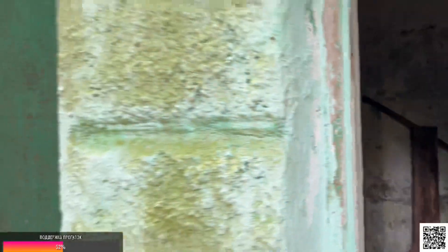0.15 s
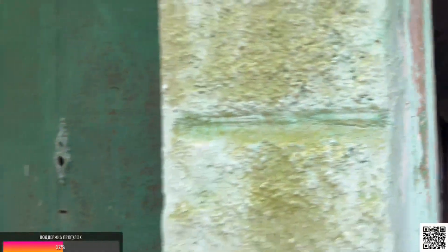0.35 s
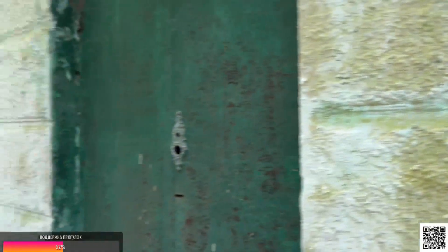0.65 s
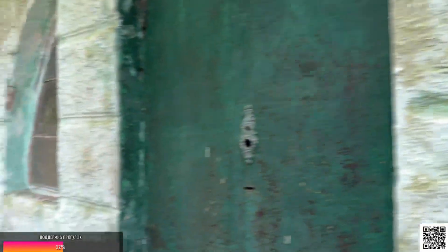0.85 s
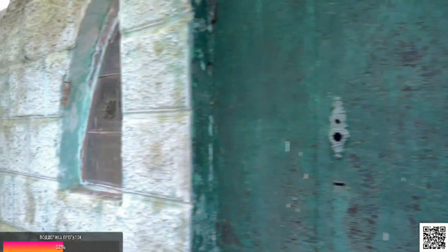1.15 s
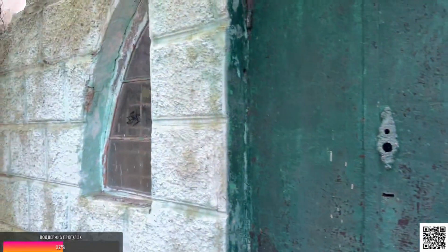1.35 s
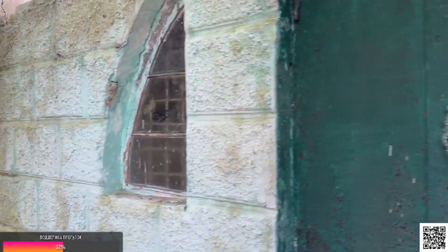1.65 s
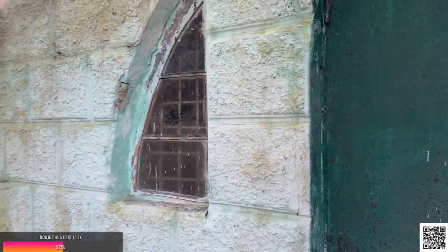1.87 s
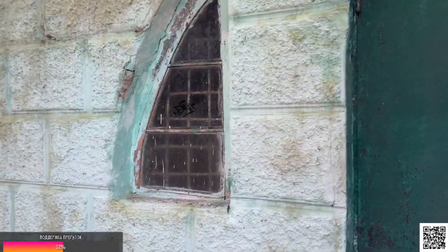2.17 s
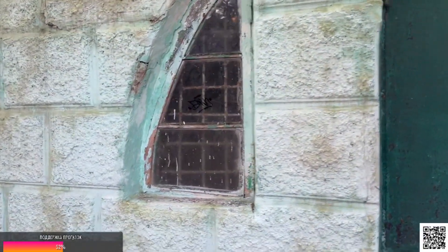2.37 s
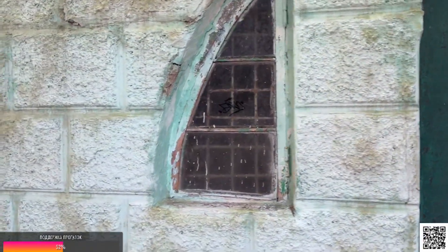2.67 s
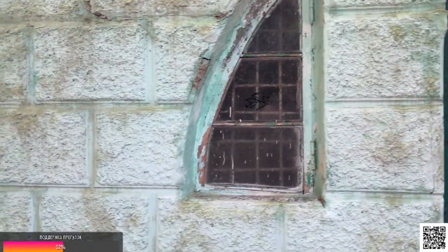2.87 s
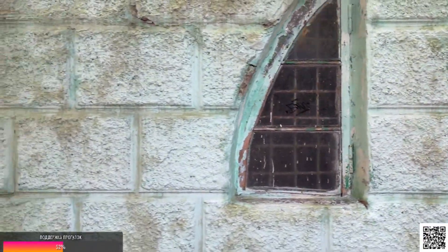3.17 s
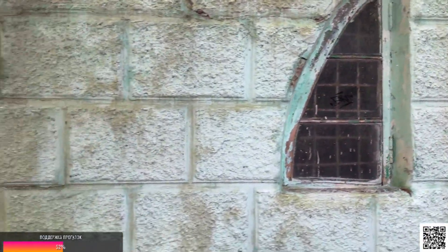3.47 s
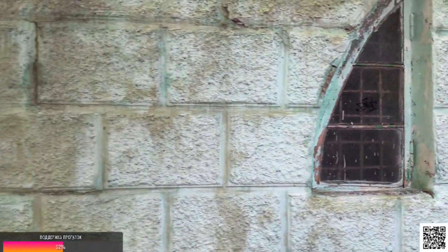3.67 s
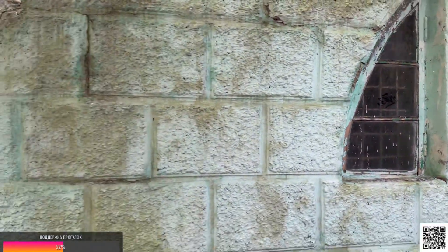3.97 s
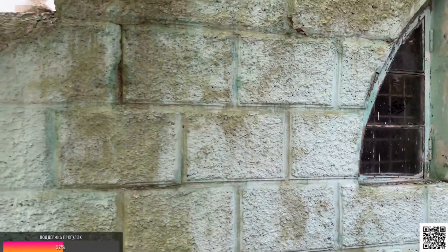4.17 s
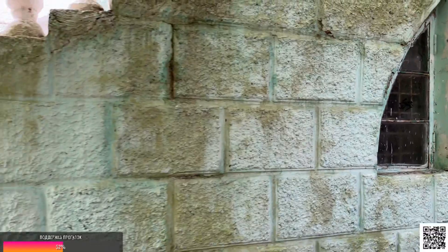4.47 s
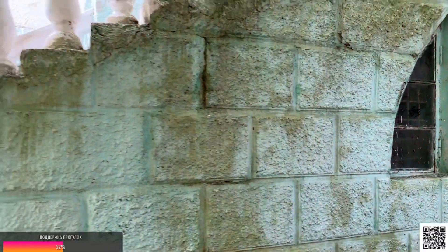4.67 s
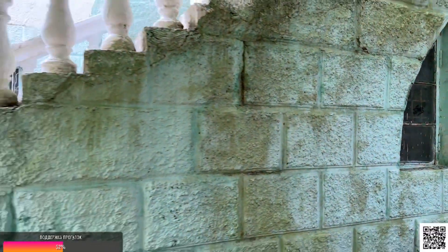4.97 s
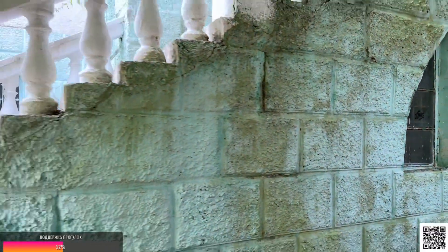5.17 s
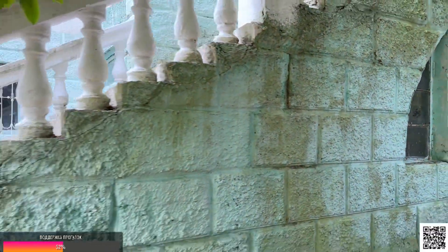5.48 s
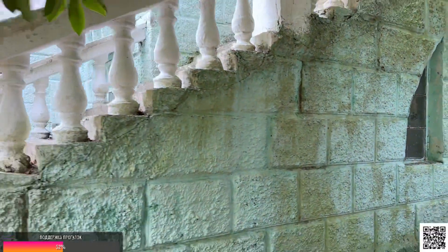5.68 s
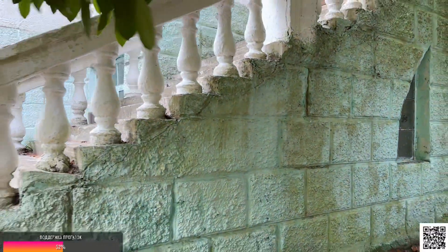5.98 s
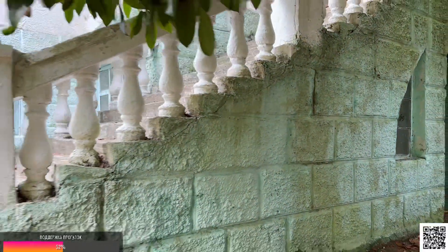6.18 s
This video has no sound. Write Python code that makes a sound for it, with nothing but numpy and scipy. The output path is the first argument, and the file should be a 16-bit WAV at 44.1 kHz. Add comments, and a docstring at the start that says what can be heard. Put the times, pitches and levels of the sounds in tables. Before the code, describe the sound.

Someone walks unhurriedly on gritty ground, soles crushing grains, small bits clicking and skittering, twigs snapping sharply, over very faint rumbling air.

```python
"""Footsteps on grit beside a stone wall

Someone walks slowly over grit and dry debris, carrying the microphone. Soles scuff and crush the grit
(ticks, damped sines and noise); bits crack, knock and skitter (short tones, noise and resonances).
Two dry twigs snap (decaying modes) and heels thud softly (low sines). Once a hollow, rough tone swells
further off (wavering sine, resonant noise). Air rumbles faintly under it all (filtered noise)."""
import sys
import numpy as np
from scipy import signal
from scipy.fft import rfft, irfft, next_fast_len
from scipy.io import wavfile
from scipy.ndimage import map_coordinates

SR = 44100
rng = np.random.default_rng(int(sys.argv[2]) if len(sys.argv) > 2 else 0)


def int16_out(signal):
    """Quantize to a 16-bit WAV file."""
    q = np.round(np.clip(np.atleast_2d(signal).T, -1, 1) * 32767)
    wavfile.write(sys.argv[1], SR, q.astype(np.int16))


N = 279108  # samples, about 6.3 s


def scuff():
    """The sole drags over grit: grains give way in clumps, together in all three size classes."""
    # Spectra of grit, its dull part and finest sand. Each row: frequency in Hz, level in dB.
    grit_spectrum = [(1200, -12), (2000, -1.5), (3000, 0), (4500, 0.5), (5600, -2), (6500, -8.5),
                     (8500, -17), (11000, -21.5)]
    dull_spectrum = [(200, -29.5), (450, -0.5), (900, -2), (1500, -2.5), (2100, -10), (3000, -61.5)]
    sand_spectrum = [(4000, -36.5), (6000, 5), (7500, 13), (10000, -1), (13000, -16), (16000, -29)]
    crunch_level, dull_level, sand_level, stone_hz = strokes()
    clumps = amp(1.6686 * wobble(70) + 0.691 * wobble(250) - 2.0)

    stones = grains(count=9000, mid_hz=stone_hz, octaves=0.27967, cycles=3.145, spread_db=1.0)
    crushed = coloured(crackle(rate=1300, spread_db=-1.0, grain_share=0.55), grit_spectrum)
    grit = unit(crushed + 0.9765 * stones)

    rubble = grains(count=2000, mid_hz=stone_hz / 3.2718, octaves=0.56404, cycles=2.642, spread_db=4.0)
    dull = unit(coloured(rng.standard_normal(N), dull_spectrum) + 0.8636 * rubble)

    sand = coloured(crackle(rate=1400, spread_db=-1.0, grain_share=0.7203), sand_spectrum)
    return clumps * (crunch_level * grit + dull_level * dull + sand_level * sand)


def strokes():
    """Levels of crunch, dull part and sand, and the stone pitch, as the powers of all strokes add up."""
    # The sole drags or presses on the grit. Each row: start of the hold in seconds, rise in seconds over
    # 60 dB, hold in seconds, fall in seconds over 60 dB, crunch level in dB, dull part and finest sand
    # in dB relative to the crunch, stone pitch in Hz. Signs of rise, hold and fall do not matter.
    drags = [(0.0, .01, 0.0034, 1.4679, -64, -4.5, -11, 4289),
             (0.096, -0.2215, 0.0187, 1.6257, -62.5, -9, -18.5, 4082),
             (0.161, 0.081, 0.0553, 1.0591, -49.5, -20, -17.5, 4142),
             (0.202, 0.0512, 0.0197, 0.362, -44.5, -9.5, -29.5, 4248),
             (0.273, 0.2754, 0.00637, 0.4066, -45, -12, -14.5, 3865),
             (0.356, 0.0039, 0.0535, 0.4763, -49.5, -7.5, -15.5, 3552),
             (0.577, 1.2151, 0.0311, 0.1449, -59.5, 1, -13, 3260),
             (0.503, 0.2445, 0, 0.2174, -47.5, -7, -35, 3093),
             (0.76, 2.277, 0, 1.8833, -65.5, -2.5, -11.5, 3512),
             (0.966, 0.2671, 0.0438, 0.3518, -41, -8.5, -19.5, 3830),
             (1.058, 0.3926, 0.0307, 0.6041, -49, -5.5, -27.5, 3602),
             (1.189, 0.5985, 0, 0.6529, -52.5, -3, -17, 3373),
             (1.344, -0.74, 0, 0.8508, -64, -30.5, -13, 3223),
             (1.605, 0.7772, 0.1316, 1.5443, -58, -5, -13, 3787),
             (1.7, 0.0902, 0.00685, 0.0878, -45.5, -12.5, -24, 4395),
             (1.749, 0.1433, 0.0175, 0.2759, -60, -4.5, -21, 4366),
             (1.925, 0.8873, 0.0274, 1.9409, -65, 1.5, -27.5, 2814),
             (2.401, 1.6775, 0, 1.232, -66.5, 2.5, -13, 3530),
             (2.658, 0.406, 0.0219, 0.2887, -63, -6, -17, 3283),
             (2.794, 0.3487, 0.0089, 1.1988, -62.5, 2, -13.5, 3162),
             (3.158, 0.5253, 0, 2.3484, -67.5, 6, -33.5, 2504),
             (3.364, 0.7582, 0.0725, 0.6277, -63, 8.5, -15, 2815),
             (3.666, 2.91, 0.0221, 1.4316, -69.5, 7, -11, 2955),
             (3.891, -0.0274, 0, 0.9576, -58, 0, -24, 2968),
             (4.021, 0.2536, 0, 0.6747, -57, -0.5, -15.5, 2610),
             (4.149, 0.5068, 0.29, 0.5559, -59, -6, -25, 2916),
             (4.396, 0.2143, 0.338, 0.41, -59, 5.5, -13.5, 3307),
             (4.649, -1, 0.0931, 1.4334, -68, 0, -3, 3576),
             (5.442, 0.8819, 0.0266, 1.0151, -68, 0.5, -8, 3505),
             (5.564, 0.0855, 0.0092, 1.8488, -68.5, 1.5, -6.5, 3509),
             (5.822, 0.1195, 0, -0.5552, -66, -2, -25, 3100), (6.0, 0.68, 0.043, 1.89, -70, 5, -4.5, 3496),
             (4.956, -1.3055, 0.0795, 1.0496, -63, -6, -19.5, 3604),
             (6.28, 0.2624, 0.0151, 1.6891, -64, 1, -9, 3015)]
    # The foot comes down: start of the hold in seconds.
    landing_s = [0.854, 2.152, 3.802, 4.363, 4.846, 6.038]
    # The crunch of each landing. Each row: hold in seconds, fall in seconds over 60 dB, crunch level in dB,
    # dull part and finest sand in dB relative to the crunch, stone pitch in Hz.
    landings = [(0, .5, -51, 1, -13, 3353.6), (0.0136, 0.8362, -54, -5, -13.5, 3131.7),
                (0, 0.5159, -50.5, -3, -18, 2521.8), (0.00863, 0.0922, -43, -13.5, -7, 4480),
                (0.02719, 0.1804, -38, -8, -12, 4046.5), (0.14231, 0.207, -40, -4.5, -16, 4000.6)]
    landing_rise_s = 0.012  # over 60 dB: almost at once
    sag_db_per_s = 38.5  # the crunch weakens while the sole holds
    settle_db, settle_s = -19, 0.7224  # loosened grit trickles on, falling 60 dB in settle_s

    t, total = np.arange(N) / SR, np.zeros((4, N))
    steps = [(s, landing_rise_s, *row) for s, row in zip(landing_s, landings)]
    for s, rise, hold, fall, db, dull_db, sand_db, hz in drags + steps:
        before = np.maximum(s - t, 0)
        held = np.clip(t - s, 0, abs(hold))
        after = np.maximum(t - s - abs(hold), 0)
        swell = amp(db - 60 * before / abs(rise) - sag_db_per_s * held)
        release = amp(-60 * after / abs(fall)) + amp(settle_db - 60 * after / settle_s)
        power = (swell * release) ** 2 + 1e-12
        total += power * np.array([[1], [amp(2 * dull_db)], [amp(2 * sand_db)], [hz]])
    return *np.sqrt(total[:3]), total[3] / total[0]  # the pitch is a mean weighted by crunch power


def grains(count, mid_hz, octaves, cycles, spread_db):
    """Small stones: short damped sines at scattered times and sizes, pitched around the curve mid_hz."""
    draw, t = rng.random((count, 2)), np.arange(256) / SR
    start = (draw[:, :1] * N).astype(int)
    hz = np.clip(mid_hz[start] * 2 ** (octaves * rng.standard_normal((count, 1))), 300, 9000)
    size = amp(-spread_db * np.log(np.maximum(draw[:, 1:], 0.02)))
    rings = size * np.sin(2 * np.pi * hz * t) * np.exp(-t * hz / cycles)
    places = start + np.arange(256)
    return unit(np.bincount(places.ravel(), rings.ravel(), N + 256)[:N])


def crackle(rate, spread_db, grain_share):
    """Random ticks of unequal size, rate a second, on a bed of noise."""
    size_db = spread_db * np.minimum(rng.exponential(size=N), 4)
    ticks = (rng.random(N) < rate / SR) * amp(size_db) * rng.choice([-1, 1], N)
    share = np.clip(grain_share, 0, 1)
    return np.sqrt(share) * unit(ticks) + np.sqrt(1 - share) * rng.standard_normal(N)


def cracks(under_db, far_db):
    """Each bit rings briefly at its own pitch and sprays grit around that pitch."""
    # Bits of debris crack (high) or knock (low).
    # Each row: start in seconds, level in dB, pitch in Hz, share of noise from 0 to 1.
    bits = [(0.0912, -42.5, 4153, 0.58), (0.189, -37, 3561, 0.47), (0.201, -33.5, 4645, 0.21),
            (0.201, -42, 404.3, 0), (0.2302, -46.5, 3300, 0.73), (0.2769, -37, 4679, 0.69),
            (0.279, -34, 1459, 0.76), (0.345, -42.5, 4400, 0.79), (0.456, -49.5, 3400, 0.85),
            (0.489, -44.5, 938.3, 0), (0.5031, -36, 3508, 0.03), (0.8539, -40.5, 1484, 0.25),
            (0.8965, -51.5, 1631, 0.25), (0.964, -23.5, 2884, 0.39), (0.9759, -20.5, 4789, .36),
            (0.978, -36.5, 9713, 0.46), (0.9865, -20, 3140, 0.36), (0.995, -23, 3926, 0.67),
            (1.003, -29.5, 2695, 0.56), (1.044, -31.5, 1445, 0.1), (1.045, -25.5, 3899, 0.48),
            (1.0502, -27, 3248, 0.44), (1.142, -49, 5483, 0.41), (1.1655, -30.5, 3138, 0.45),
            (1.17, -34, 3331, 0.06), (1.1921, -31, 2925, 0.5), (1.25, -42, 4276, 0.4),
            (1.5721, -38.5, 3670, 0.44), (1.6355, -45, 3879, 0.19), (1.662, -37.5, 2358, 0.54),
            (1.688, -34.5, 2698, 0.72), (1.697, -27.5, 4524, 0.47), (1.949, -42.5, 251.8, 0.11),
            (2.1533, -41, 2426, 0.2), (2.1751, -37.5, 2992, 0.32), (2.185, -38, 3186, 0.68),
            (2.6531, -42.5, 3004, 0.61), (2.774, -34, 240.3, 0.37), (3.1015, -42.5, 2200, 0.94),
            (3.317, -41, 517.8, 0), (3.6128, -44.5, 3053, 0.8), (3.936, -33, 3011, 0.92),
            (4.171, -47.5, 551.8, 0.13), (4.3629, -44.5, 2178, 0.13), (4.3897, -39.5, 4478, .8),
            (4.396, -40.5, 581.4, 0.33), (4.413, -36, 247.7, 0.33), (4.423, -30, 245.9, 0.46),
            (4.455, -36, 268.3, 0.58), (4.494, -45.5, 398.3, 0.34), (4.53, -47.5, 300.2, 0.41),
            (4.565, -45, 300, 0.25), (4.63, -40.5, 299.2, 0.47), (4.685, -43, 298.2, 0.67),
            (4.8541, -37.5, 3835, 0.25), (4.863, -27, 4359, 0.58), (5.008, -45, 448.8, 0.46),
            (5.455, -44.5, 301.4, 0.31), (5.508, -38, 379.7, 0.38), (5.648, -44.5, 262.9, 0.56),
            (5.799, -56, 5970, 0.91), (5.8208, -49, 3122, 0.39), (5.916, -51, 540.5, 0.35),
            (5.965, -53.5, 620.6, 0.2), (5.98, -53, 637.9, 0.14), (6.0373, -29.5, 4412, 0.38),
            (6.047, -28, 1447, 0.21), (6.0683, -24.5, 2924, 0.59), (6.0758, -25.5, 2593, 0.89),
            (6.1013, -30.5, 1854, 0.35), (6.128, -31, 1331, 0.11), (6.128, -26, 4263, 0.45),
            (6.1576, -25, 3774, 0.88), (6.1705, -27, 2979, 0.67), (6.1884, -29, 4107, 0.52),
            (6.246, -35.5, 792, 0.83), (6.2555, -35, 1476, 0.98)]
    tone_t60_s = 0.017974  # ring time of a bit without noise
    noisy_shorter = 0.52426  # share of its ring time that a bit of pure noise loses
    over_1k_db, over_db_per_octave = -4.5, -7  # spray above a 1 kHz bit; low bits spray wider

    out, t = np.zeros(N), np.arange(SR // 8) / SR
    for s, db, hz, noisy in bits:
        over_db = over_1k_db + over_db_per_octave * np.log2(hz / 1000)
        spread = [(hz / 8, 4 * under_db), (hz / 2, under_db), (hz * 1.33, -1.5),
                  (hz * 2.44, over_db), (hz * 6, far_db)]
        spray = coloured(rng.standard_normal(len(t)), spread)
        blur = 0.0535 * np.cumsum(rng.standard_normal(len(t)))  # rough surface blurs the pitch
        tone = np.sin(2 * np.pi * hz * t + blur)
        share = np.clip(noisy, 0, 1)
        decay = amp(db - 3.0 - 60 * t / (tone_t60_s * (1 - noisy_shorter * share)))
        attack = 1 - np.exp(-t / 0.00050444)
        spike = 1 + 1.3088 * np.exp(-t / 0.000519)  # as it breaks
        mix = (1 - share) * 1.8408 * tone + share * 1.2399 * spray
        add(out, s, decay * attack * spike * mix)
    return out


def skitter():
    """A dry shard skitters over the ground: each scrape is a burst of grit in the shard's resonances."""
    # Each row: start in seconds, level in dB, time to fall 60 dB in seconds, tilt in dB per octave.
    scrapes = [(3.8016, -32.5, 0.0735, -3.5), (3.8125, -37.5, 0.1129, 7.5), (3.851, -43, 0.0459, -1.5),
               (3.874, -31.5, 0.05675, -15.5), (3.8874, -36, 0.0402, 7.5), (3.988, -33.5, 0.05477, 2.5),
               (3.9932, -35.5, 0.02835, -12.5), (4.013, -29.5, 0.06013, -6), (4.0233, -35, 0.0474, 17.5),
               (4.0524, -42, 0.0497, 1.5), (4.0866, -42, 0.0647, 11.5), (4.12, -41.5, 0.0845, 7),
               (4.133, -37, 0.0788, -5.5), (4.1678, -35, 0.07252, 3), (4.2034, -42.5, 0.07174, 7),
               (4.2251, -48.5, 0.0553, -7.5), (4.2666, -43, 0.07124, 1), (4.326, -45, 0.0607, -2.5)]
    # Resonances of the shard. Each row: frequency in Hz, width in Hz, level in dB before the tilt.
    shard = [(1759.7, 158.9, -0.5), (2295.5, 242.8, 3.5), (3291.9, 247.4, 2.5), (4628.2, 261.9, -13.5),
             (5325, 364, -24.5)]
    out, t = np.zeros(N), np.arange(SR // 6) / SR
    for s, db, t60, tilt_db in scrapes:
        modes = []
        for hz, width, level in shard:
            scatter_db = 5.13 * rng.standard_normal()
            modes.append((hz, width, level + tilt_db * np.log2(hz / 2500) + scatter_db))
        contacts = rng.standard_normal(len(t)) ** 3  # cubed noise is spiky
        rasp = unit(filtered(contacts, resonances(modes)))
        decay = amp(db - 6.5 - 60 * t / t60)
        attack = 1 - np.exp(-t / 0.0009094)
        spike = 1 + 0.8015 * np.exp(-t / 0.001447)
        add(out, s, decay * attack * spike * rasp)
    return out


def snaps():
    """Dry wood breaks: a few modes that die within milliseconds; a thick twig adds a low one."""
    # Each row: start in seconds, level in dB, tilt in dB per octave, level of the lowest mode in dB.
    breaks = [(3.361, -13, 1.5, -44), (3.5372, -18.5, 3, -1.5)]
    # Modes of a twig. Each row: frequency in Hz, level in dB before the tilt, time to fall 60 dB in seconds.
    twig = [(1478.2, 1, 0.00934), (2291.9, -5, 0.009715), (2470.8, 3, 0.008133), (4257.6, -10, 0.007483),
            (5126.7, -2, 0.005697), (6471, -14, 0.005987), (9081.5, -24, 0.003925)]
    out, t = np.zeros(N), np.arange(SR // 20) / SR
    for s, db, tilt_db, thick_db in breaks:
        ring = np.zeros(len(t))
        for hz, level, t60 in twig + [(1002.3, thick_db, 0.01212)]:
            decay = amp(level + tilt_db * np.log2(hz / 2500) - 60 * t / t60)
            ring += decay * np.sin(2 * np.pi * hz * t)
        attack = 1 - np.exp(-t / 0.0007508)
        add(out, s, amp(db - 2) * ring * attack)
    return out


def heels():
    """Soft low pushes of the heel into the ground, each a decaying sine."""
    # Each row: start in seconds, level in dB, pitch in Hz.
    thuds = [(0.514, -53, 72.58), (1.124, -52.5, 91.96), (1.2, -49.5, 129.2), (1.96, -51.5, 224.6),
             (2.18, -44.5, 108.9), (2.35, -50.5, 70.66), (2.768, -40.5, 139.8), (2.8, -55.5, 142.8),
             (3.305, -46.5, 113), (3.457, -48.5, 142.8), (3.845, -48, 120.4), (4.412, -41.5, 141.5),
             (4.449, -43, 150.7), (4.499, -43, 110), (4.649, -44.5, 80.14), (4.882, -45.5, 98.16),
             (5.447, -47.5, 105), (5.593, -49, 72.01), (6.079, -52.5, 90.56)]
    t60_s = 0.07729
    out, t = np.zeros(N), np.arange(SR // 3) / SR
    for s, db, hz in thuds:
        decay = amp(db + 3.0 - 60 * t / t60_s)
        attack = 1 - np.exp(-t / 0.00289)
        add(out, s, decay * attack * np.sin(2 * np.pi * hz * t))
    return out


def wall(x):
    """A few weak early echoes and a short diffuse tail off the stone."""
    # Each row: delay in seconds, level in dB.
    echoes = [(.0056, -14.5), (0.0123, -1), (0.018, -26.5)]
    t = np.arange(SR // 4) / SR
    decay = amp(-60 * t / 0.1957)
    response = amp(3) * rng.standard_normal(len(t)) * decay / np.sqrt(SR * 0.009785)
    for s, db in echoes:
        response[round(s * SR)] += amp(db)
    return signal.fftconvolve(x, response)[:N]


def hollow_tone():
    """An unsteady tone with noise in narrow resonances around it, like a tube or a rubbed door."""
    # The far tone swells and fades. Each row: time in seconds, tone level in dB, rasp level in dB.
    swells = [(3.0, -79.5, -79.5), (3.02, -60.5, -59), (3.045, -53, -57), (3.066, -56, -55),
              (3.074, -44.5, -47.5), (3.09, -37.5, -48.5), (3.11, -60, -44), (3.152, -35.5, -41.5),
              (3.19, -52, -46.5), (3.26, -48, -52.5), (3.286, -61, -52.5), (3.298, -49.5, -51.5),
              (3.319, -49.5, -53.5), (3.36, -65, -63.5), (3.59, -69, -58.5), (3.606, -51, -67),
              (3.635, -65.5, -77.5), (3.73, -77, -72.5), (3.75, -61, -64.5), (3.79, -61, -81)]
    # Resonances of the rasp. Each row: frequency in Hz, width in Hz, level in dB.
    pipe = [(438.12, 43.2, -8), (562.45, 27.96, -1.5), (670.41, 82.6, -5), (959.36, 36.73, -4),
            (1109.8, 28.86, -7.5), (1311.6, 94.8, -13.5), (1588.2, 55.53, -10), (2076.6, 45.2, -11)]
    tone_hz = 528.69
    t = np.arange(N) / SR
    tone_db, rasp_db = curves(swells)
    waver = 1.1236 * wobble(40)  # radians
    tone = amp(tone_db + 1.5 + 2.099 * wobble(50)) * np.sin(2 * np.pi * tone_hz * t + waver)
    rasp = amp(rasp_db - 1.0) * unit(filtered(rng.standard_normal(N), resonances(pipe)))
    sounding = (t > swells[0][0]) * (t < swells[-1][0])
    return sounding * (tone + rasp)


def air():
    """Two bands of rumbling noise that swell and sink, over a steady faint hiss."""
    # Each row: time in seconds, deep level in dB, low level in dB.
    rumble = [(0.0, -67.5, -76), (0.19, -69.5, -68.5), (0.42, -58.5, -63.5), (0.76, -66.5, -68.5),
              (1.2, -59, -60.5), (1.39, -66, -65.5), (2.15, -68, -62.5), (2.34, -59.5, -59),
              (2.61, -71.5, -67), (2.8, -54.5, -60), (3.08, -68.5, -65.5), (3.4, -60.5, -59.5),
              (3.86, -69.5, -67), (3.93, -63, -58), (4.33, -67.5, -69), (4.46, -57, -55), (4.76, -66, -66),
              (5.3, -68, -72), (5.6, -57.5, -62), (5.69, -67, -70), (6.33, -62.5, -71.5)]
    # Spectra of deep rumble, low rumble and still air. Each row: frequency in Hz, level in dB.
    deep_spectrum = [(10, 8), (30, 2), (60, 2), (100, 0), (160, -45.5)]
    low_spectrum = [(50, -43), (120, 5), (250, 1), (500, -3.5), (900, -39)]
    still_spectrum = [(120, -19), (200, -15), (231, -3), (302, -13.5), (653, -4), (809, -8.5), (885, -8.5),
                      (1040, -11), (3850, -21), (4770, -18.5), (14500, -39)]
    deep_db, low_db = curves(rumble)
    deep = amp(deep_db + 1.711 * wobble(3.3082)) * coloured(rng.standard_normal(N), deep_spectrum)
    low = amp(low_db - 0.5 + 2.1124 * wobble(15)) * coloured(rng.standard_normal(N), low_spectrum)
    hiss = amp(-69.0) * coloured(rng.standard_normal(N), still_spectrum)
    return deep + low + hiss


def amp(db):
    """Gain of a level in dB."""
    return 10 ** (np.asarray(db) / 20)


def unit(x):
    """x at rms 1."""
    return x / np.sqrt(np.mean(x ** 2) + 1e-20)


def curves(rows):
    """One value per sample for each column after the time."""
    s, *cols = np.transpose(rows)
    return [np.interp(np.arange(N) / SR, s, c) for c in cols]


def wobble(rate):
    """A smooth random curve, rate knots a second."""
    knots = rng.standard_normal(int(N * rate / SR) + 4)
    return map_coordinates(knots, [np.arange(N) * rate / SR])


def filtered(x, response):
    """x times a complex response of frequency."""
    m = next_fast_len(len(x) + 8192)
    return irfft(rfft(x, m) * response(np.fft.rfftfreq(m, 1 / SR)), m)[:len(x)]


def coloured(x, points):
    """x through a spectrum of (Hz, dB) points, at rms 1."""
    f, db = np.transpose(points)
    return unit(filtered(x, lambda hz: amp(np.interp(np.log(hz + 1), np.log(f), db))))


def resonances(modes):
    """The causal response of (Hz, width Hz, dB) modes, added with alternating sign."""
    def response(f):
        total = 0
        for k, (hz, width, db) in enumerate(modes):
            damping = 1j * f * width
            total = total + (-1) ** k * amp(db) * damping / (hz * hz - f * f + damping)
        return total
    return response


def add(track, s, sound):
    """Mixes a sound into the track at time s."""
    part = track[round(s * SR):][:len(sound)]
    part += sound[:len(part)]


def scene():
    """All sources, heard by one microphone; the twigs snap closer, so the wall adds less to them."""
    debris = cracks(under_db=-6, far_db=-39.5) + skitter()
    twigs = snaps()
    answer = wall(amp(-15.5) * debris + amp(-26) * twigs)
    return (scuff() + debris + twigs + heels() + answer + hollow_tone() + air())[None]


def record(dry):
    """The treble dips near 8 kHz, fades in the top octave and ends at top_hz."""
    dip_hz, dip_octaves, dip_db = 7976, 0.17492, -3.5
    top_hz = 15735

    def treble(hz):
        octaves_off = np.log2((hz + 1) / dip_hz)
        dip = amp(dip_db * np.exp(-(octaves_off / dip_octaves) ** 2))
        return dip * (hz < top_hz) / (1 + (hz / 14000) ** 8)

    return filtered(dry[0], treble)[None]


dry = scene()
out = record(dry)
int16_out(out)
```